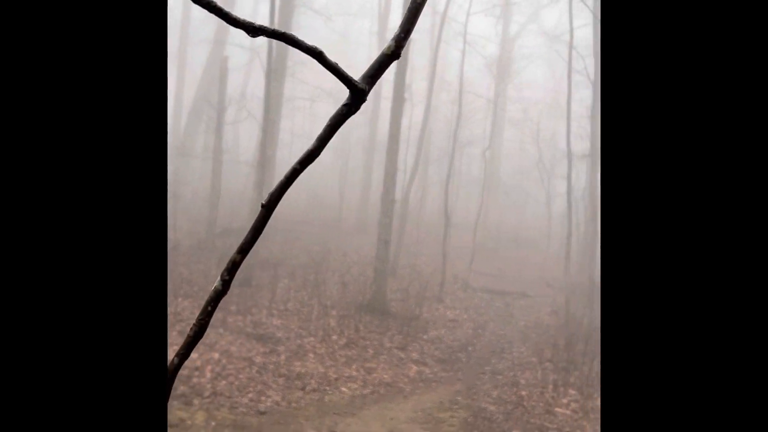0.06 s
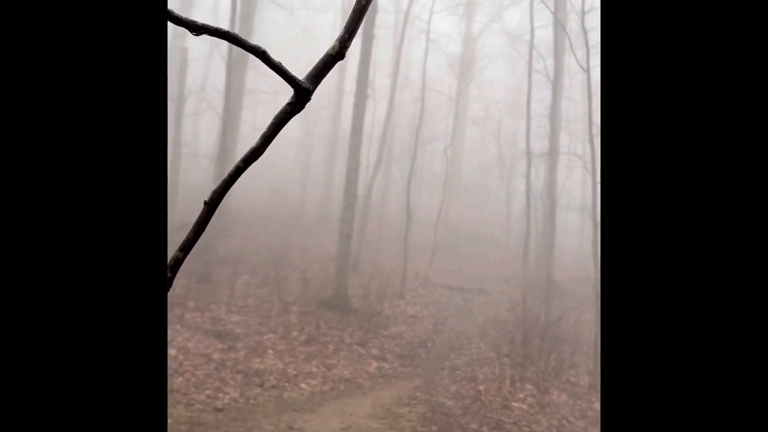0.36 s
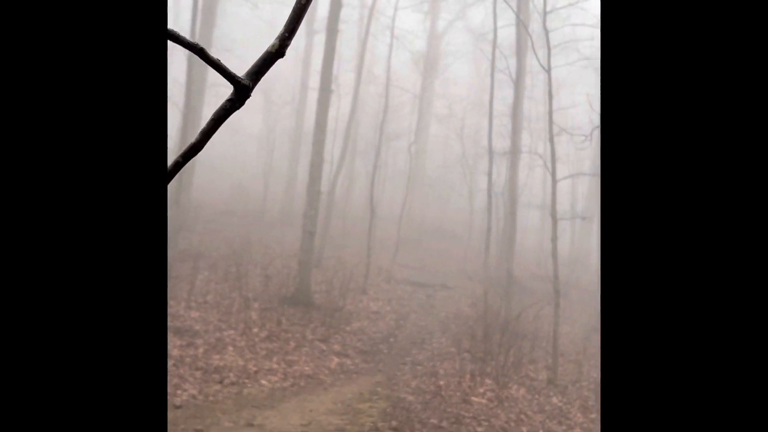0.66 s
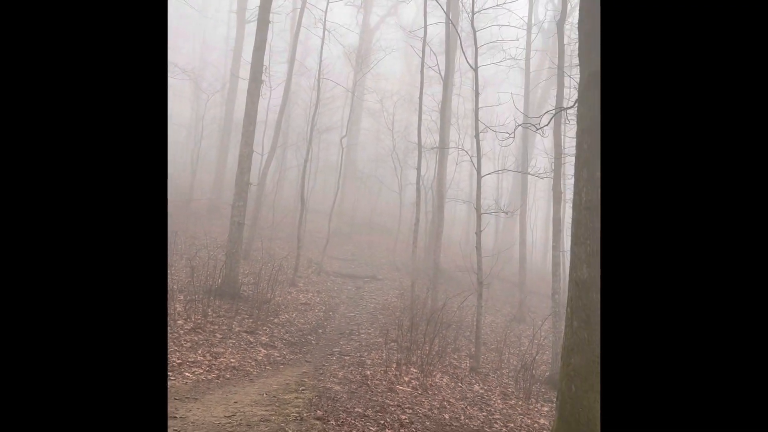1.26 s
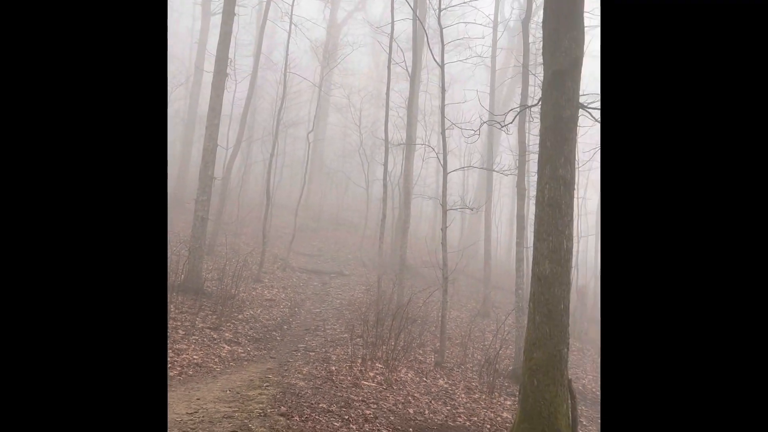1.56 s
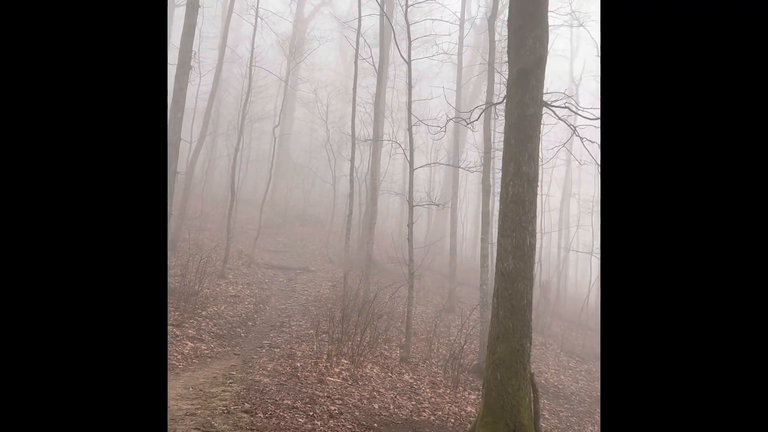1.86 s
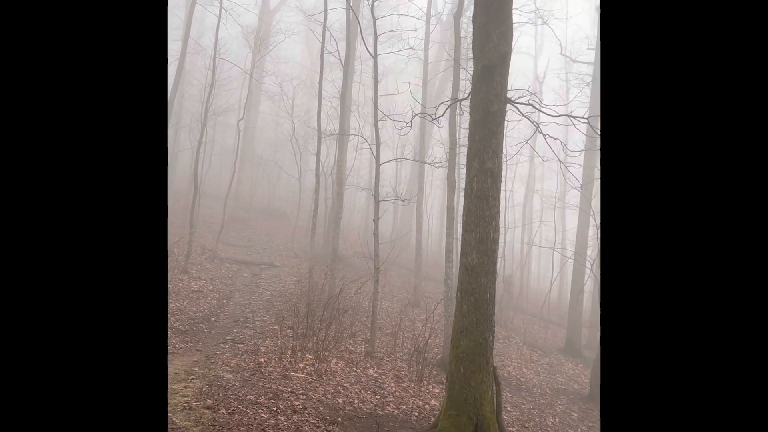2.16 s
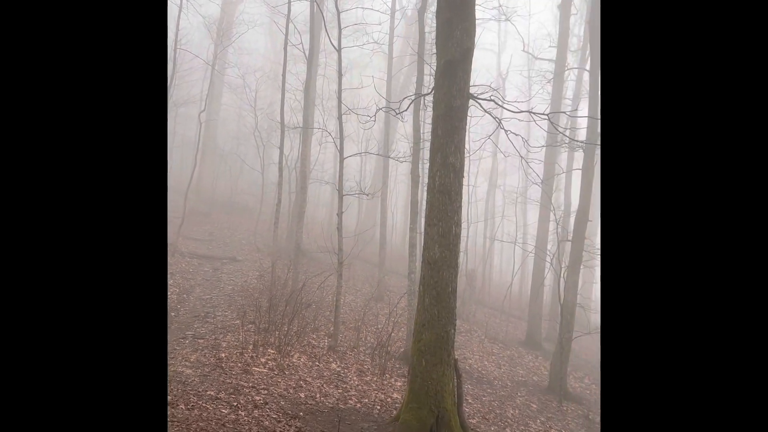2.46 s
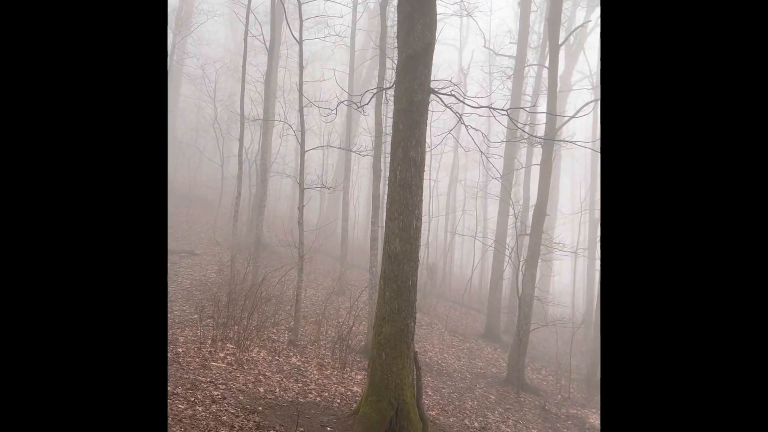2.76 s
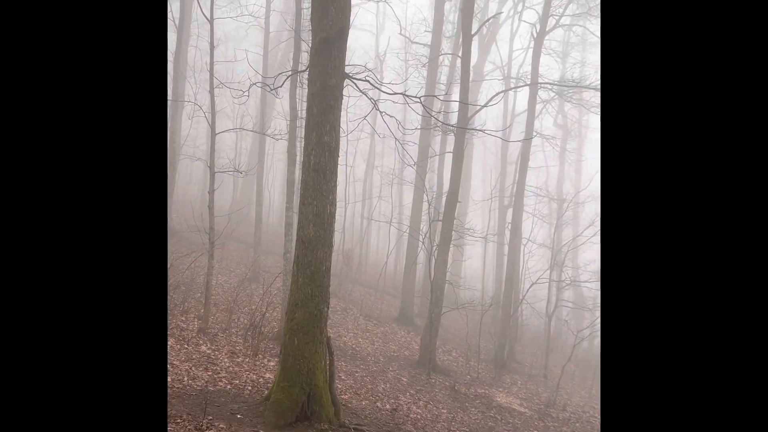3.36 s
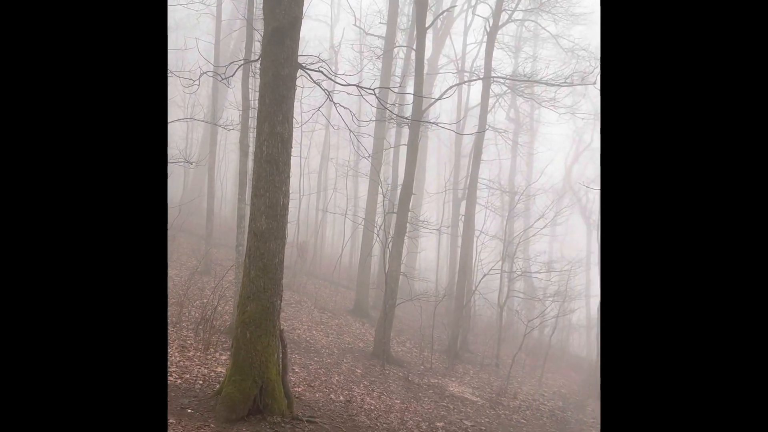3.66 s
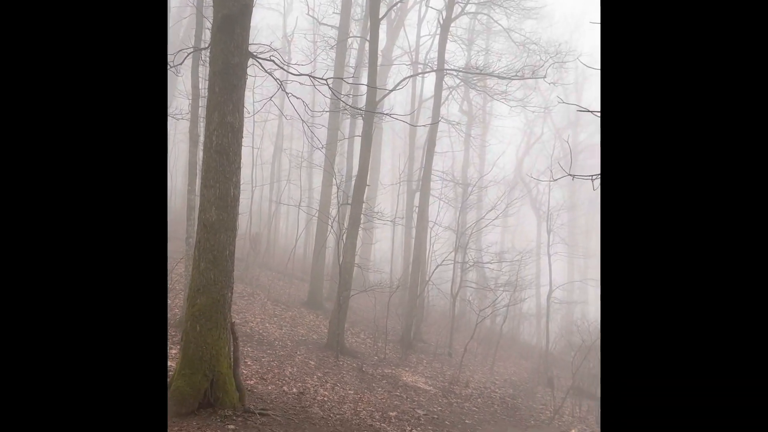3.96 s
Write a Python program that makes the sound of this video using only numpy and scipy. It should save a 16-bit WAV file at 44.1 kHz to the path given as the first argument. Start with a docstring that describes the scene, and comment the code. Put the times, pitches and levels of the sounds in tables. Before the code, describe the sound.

Drips tap sharply on forest leaf litter over faint patter and a fading wind rumble.

```python
"""From the start, sparse drops tick sharply on dead leaves in a foggy wood, over a fine sizzle of spray
and the soft patter of far drops. For the first second a breeze buffets the microphone with rumble,
puffs and dull thumps, then dies to a faint rumble with a few puffs. At 2.3 s a heavy drop knocks on
dead wood to the right, and the ticking carries on to the end while a soft low rush comes and goes."""
import sys
import numpy as np
from scipy import signal
from scipy.fft import rfft, irfft, next_fast_len
from scipy.io import wavfile
from scipy.ndimage import uniform_filter1d, map_coordinates

SR = 44100
rng = np.random.default_rng(int(sys.argv[2]) if len(sys.argv) > 2 else 0)


def inscribe(sig):
    """Save sig as 16-bit PCM at rate SR to the path in sys.argv[1].

    A 1-D sig is mono; a 2-D sig holds one channel per row.
    Samples are clipped to [-1, 1] before scaling.
    """
    pcm = np.round(np.clip(np.atleast_2d(sig).T, -1, 1) * 32767)
    wavfile.write(sys.argv[1], SR, pcm.astype(np.int16))


N = 176400
TOP_HZ = 16700  # ceiling for the microphone and for the far leaves' pitch

# Foreground ticks: t/s, level/dB, leaf pitch f/Hz, resonance Q, slap against ring level/dB
NEAR_HITS = [(0.0138, -29, 10200, 0.56, -1.5), (0.1483, -27.5, 2340, 1.3, -4.5),
             (0.2179, -38.5, 1810, 1, 7), (0.2637, -29, 9200, 2.2, -2), (0.453, -28, 9400, 0.9, 4),
             (0.561, -13.5, 6700, 1.24, -13.5), (0.595, -28, 10300, 0.8, -6), (0.61, -28, 10000, 0.62, -8),
             (0.618, -27, 9100, 0.93, -6), (0.7027, -16, 13500, 5.8, -19), (0.7174, -24, 10700, 2.4, -2.5),
             (0.7363, -21, 5540, 0.38, -17.5), (0.856, -15.5, 10500, 0.23, -6.5),
             (0.8727, -21.5, 10300, 2, -4.5), (0.957, -15, 9100, 0.71, -11.5),
             (0.9757, -17.5, 2600, 6.3, -7.5), (0.9814, -13, 6000, 1.37, -12), (1, -22, 1450, 1.5, -3.5),
             (1.0206, -19.5, 12500, 0.79, -10), (1.0732, -27, 3980, 0.46, -31),
             (1.1448, -24.5, 8800, 4.4, -28), (1.1815, -24, 4300, 0.44, 0.5), (1.2386, -29, 2330, 0.6, -13),
             (1.4316, -22.5, 1830, 1.5, -8), (1.4535, -27.5, 5400, 1, 1), (1.624, -17, 14100, 0.91, -15),
             (1.6333, -22.5, 9800, 0.6, -26), (1.821, -21.5, 14000, 0.63, -4),
             (1.909, -27, 5900, 1.4, -1.5), (1.9852, -25, 8200, 14, -3), (2.025, -24.5, 14300, 0.98, -9),
             (2.1713, -18, 3800, 4.2, -12), (2.3164, -19, 4700, 2.5, -13), (2.341, -24.5, 4060, 0.37, -24),
             (2.3783, -19.5, 9400, 1.3, -8.5), (2.4242, -30, 7700, 2.6, -1), (2.4603, -24.5, 2160, 1.1, -5),
             (2.5516, -13.5, 3880, 4.7, -32), (2.5875, -28, 12700, 0.89, -3.5), (2.593, -28, 8400, 1.9, 0),
             (2.681, -24, 2220, 2.7, 1), (2.7617, -21, 4660, 1, -12), (2.7844, -19.5, 4840, 1.6, -5),
             (2.7879, -27.5, 6560, 0.7, 3), (2.8135, -25, 7440, 1.4, -6), (2.9068, -23.5, 9500, 3.9, -3),
             (3.1936, -25.5, 14100, 0.52, -19), (3.4336, -23, 7550, 2.6, -5), (3.4559, -24.5, 3300, 4.1, 1),
             (3.535, -33, 2150, 1.8, 3), (3.6323, -20.5, 4670, 1.45, -23), (3.6973, -27, 6500, 0.38, -12),
             (3.753, -25, 13100, 1, 2.5), (3.9561, -24, 7500, 0.83, -21)]
def near_drops(gain_db=2):
    """Close drops strike dead leaves, one sharp tick each."""
    return amp(gain_db) * leaf_hits(NEAR_HITS)


# EQ of the broad slap of water on a leaf: f/Hz, level/dB
SLAP_EQ = [(100, -50), (700, -10), (1050, -3.5), (2500, -3.5), (7000, -2.5), (11000, -3.5), (16000, -10)]
def leaf_hits(hits, size=2048, pan_spread_db=5.5, phase_spread_rad=0.28):
    """Each drop touches, clicks and crushes a leaf, which rings and slaps; litter and trunks echo it."""
    t, hz = np.arange(size) / SR, np.fft.rfftfreq(size, 1 / SR) + 1
    slap = minimum_phase(colour(SLAP_EQ, hz))
    preroll = size // 16  # room for the touch ahead of the click
    out = np.zeros((2, N + size))

    def burst(db, t60_s):
        noise = rng.standard_normal((2, size)) * amp(-60 * t / t60_s)
        return amp(db) * rfft(unit(noise)) / np.sqrt(size)

    for onset, db, pitch, q, slap_db in hits:
        ring = 1 / (1 + 1j * q * (hz / pitch - pitch / hz)) ** 2
        bodies = np.array([ring, amp(slap_db) * slap])
        touch = np.conj(burst(-8.5, t60_s=0.0059))  # reversed: first contact swells into the click
        crush = burst(-3, t60_s=0.0057)  # the leaf gives way
        struck = (touch + 1 + crush) * bodies  # the 1 is the click
        struck /= np.linalg.norm(struck, axis=1, keepdims=True)
        struck *= np.linalg.norm(bodies, axis=1, keepdims=True)
        bearing = phase_spread_rad * rng.choice([-1, 1]) * rng.uniform(0.15, 1)
        ports = np.exp(np.array([[1j], [-1j]]) * bearing)
        echoes = burst(-6, t60_s=0.051) * bodies.sum(axis=0)
        tick = np.roll(irfft(struck.sum(axis=0) * ports + echoes), preroll, axis=1)
        pan_db = np.array([[.5], [-.5]]) * pan_spread_db * rng.standard_normal()
        start = max(int(onset * SR) - preroll, 0)
        out[:, start:start + size] += tick * amp(db + pan_db)
    return out[:, :N]


# Cue for the knock: t/s, level/dB
KNOCK_CUES = [(2.292, -37)]
# Modes of the dead wood: f/Hz, level/dB, T60/s
WOOD_MODES = [(272, -18, 0.045), (580, -19, 0.018), (1080, 2, 0.0085), (3100, -5, 0.0085)]
def wood_knock(left_lag_s=0.0001, left_db=-6):
    """A heavy drop knocks short modes out of dead wood; the right port hears it first and louder."""
    t = np.arange(N) / SR - np.array([[left_lag_s], [0]])
    out = np.zeros((2, N))
    for onset, db in KNOCK_CUES:
        age = np.clip(t - onset, 0, .2)
        for hz, mode_db, t60 in WOOD_MODES:
            out += amp(db + mode_db - 60 * age / t60) * np.sin(2 * np.pi * hz * age)
    return out * amp([[left_db], [0]])


# Fader ride of the breeze: t/s, level/dB
BREEZE_RIDE = [(0, -43), (.1, -38), (.23, -36.5), (.43, -39.5), (.55, -44), (.8, -51), (.93, -48),
               (1.08, -42.5), (1.2, -59.5), (1.5, -59.5), (1.9, -65.5), (2.03, -53.5), (2.2, -71),
               (2.5, -61), (3.65, -69), (4, -66)]
# EQ of its deep rumble: f/Hz, level/dB
RUMBLE_EQ = [(15, -26), (38, -16), (54, -1), (70, -3.5), (100, -9), (140, -18), (200, -31), (320, -46.5),
             (700, -100)]
# Eddies breaking on the microphone: t/s, peak level/dB
PUFF_CUES = [(0.059, -29), (0.084, -30), (0.108, -30.5), (0.182, -28), (0.202, -34.5), (0.226, -36.5),
             (0.275, -30), (0.303, -33), (0.321, -35.5), (0.36, -33.5), (0.384, -37), (0.433, -37),
             (0.488, -29), (0.508, -38.5), (0.657, -52), (0.892, -39), (0.918, -41.5), (0.948, -29),
             (0.975, -32), (1.009, -48.5), (1.05, -36), (1.443, -48.5), (1.469, -45.5), (1.524, -56),
             (2.356, -52)]
# EQ of the churn and puffs: f/Hz, level/dB
EDDY_EQ = [(50, 8), (130, -2.5), (210, 3.5), (330, -1), (450, -7), (580, -14.5), (720, -32), (950, -39.5),
           (2000, -53.5)]
def breeze(rise_s=0.0049, fall_s=0.008, lag_s=0.0021, gust_db=3, churn_db=-43):
    """The breeze rumbles unevenly on the microphone, churns when strong and breaks into short puffs."""
    t, strength_db = np.arange(N) / SR, curve(BREEZE_RIDE)
    rumble_gain = amp(strength_db + 2 + gust_db * wobble(per_s=16))
    rumble = rumble_gain * rush(RUMBLE_EQ, side_db=-14, even_s=0.0424)
    eddy_gain = amp(churn_db + 3 * (strength_db - strength_db.max()))  # grows as strength cubed
    for cue, db in PUFF_CUES:
        age = t - cue - lag_s
        fade = np.maximum(-age / rise_s, age / fall_s)
        eddy_gain = np.hypot(eddy_gain, amp(db) * np.exp(-np.minimum(fade, 20)))
    return rumble + eddy_gain * rush(EDDY_EQ, side_db=-40, even_s=0.01376)


# Slow eddies pushing on the microphone: t/s, peak level/dB
THUMP_CUES = [(0.142, -28), (0.235, -27.5), (0.39, -32), (.675, -39.5), (0.909, -33.5), (0.952, -43),
              (1.1, -40.5), (1.254, -48), (1.381, -54), (1.451, -56), (1.527, -42.5), (2.08, -46.5),
              (2.367, -48.5), (3.449, -51), (3.949, -52.5)]
# Bass-heavy EQ of each push: f/Hz, level/dB
THUMP_EQ = [(35, -13), (70, 3), (120, -6), (180, -13), (280, -29.5), (450, -46), (900, -94)]
def thumps(width_s=0.016):
    """Large slow eddies each give one dull push."""
    t = np.arange(N) / SR
    push = sum(amp(db) * np.exp(-np.minimum(((t - cue) / width_s) ** 2 / 2, 20))
               for cue, db in THUMP_CUES)
    return push * rush(THUMP_EQ, side_db=-27.5, even_s=0.0257)


def far_drops(hits_per_s=110, splash_s=0.012, leaf_hz=5760, spread_octaves=0.98, leaf_q=1.8):
    """Weaker drops land at random in pairs of drop and splash; large stiff leaves ring longer."""
    pairs = int(hits_per_s * N / SR / 2)
    size, leaf, stiffness, slap = rng.standard_normal((2 * pairs, 4)).T
    times = np.repeat(rng.uniform(0, N / SR, pairs), 2) + rng.exponential(splash_s, 2 * pairs)
    pitch = np.minimum(leaf_hz * 2 ** (spread_octaves * leaf), TOP_HZ)
    q = leaf_q * 2 ** (stiffness / 2)
    ring_db = 2 * np.log2(q / leaf_q * leaf_hz / pitch)  # longer rings get more level
    drop_db = np.minimum(-36 + 4.5 * size, -28.5)  # capped to stay in the background
    slap_db = -5.5 - ring_db + 2 * slap
    return leaf_hits(zip(times % (N / SR), drop_db + ring_db, pitch, q, slap_db))


# Fader ride of the distant bed of drops: t/s, level/dB
PATTER_RIDE = [(0, -69), (1.4, -66.5), (2.1, -67.5), (2.4, -66), (4, -67.5)]
# Its soft, mid-heavy EQ: f/Hz, level/dB
PATTER_EQ = [(300, -20), (560, -12), (950, -6.5), (1900, -4), (2900, -6), (4000, -5.5), (7000, -9),
             (11000, -18), (16000, -39)]
def patter(flutter_db=2.5):
    """The most distant drops merge into a fluttering hiss."""
    gain = amp(curve(PATTER_RIDE) + flutter_db * wobble(per_s=120))
    return gain * rush(PATTER_EQ, side_db=-3, even_s=0.1)


def spray(per_s=130, low_cut_hz=7800, bed_db=-74, thrown_db=-43, fall_s=0.021):
    """Fine droplets sizzle on the litter throughout, and flare as each near drop throws up more."""
    thrown = np.zeros(N)
    for onset, db, *_ in NEAR_HITS:
        thrown[int(onset * SR)] = amp(db + thrown_db) ** 2
    power = amp(bed_db) ** 2 + signal.lfilter([1], [1, -np.exp(-1 / (fall_s * SR))], thrown)
    droplets = (rng.random((2, N)) < per_s / SR) * rng.standard_normal((2, N)) ** 2
    sizzle = filtered(droplets, lambda hz: (1j * hz / (low_cut_hz + 1j * hz)) ** 4)
    return np.sqrt(power) * unit(sizzle)


# Fader ride of the low air: t/s, level/dB
AIR_RIDE = [(1.55, -67), (1.7, -100), (1.8, -79.5), (1.87, -85), (1.99, -64), (2.2, -83), (2.32, -63.5),
            (2.46, -88), (2.58, -69), (2.69, -78), (2.79, -71), (2.92, -93), (3.03, -64), (3.16, -81.5),
            (3.3, -63.5), (3.39, -82), (3.46, -72), (3.75, -67.5), (4, -73.5)]
# Its dark EQ: f/Hz, level/dB
AIR_EQ = [(60, 1), (230, 1.5), (480, -8.5), (800, -13), (2000, -31)]
def low_air():
    """A soft low rush of air holds steady at first, then comes and goes."""
    return amp(curve(AIR_RIDE)) * rush(AIR_EQ, side_db=-18, even_s=0.044)


def amp(db):
    """Decibels to gain."""
    return 10 ** (np.asarray(db) / 20)


def unit(x):
    """Scaled to rms 1."""
    return x / np.sqrt(np.mean(x ** 2) + 1e-20)


def colour(eq, hz):
    """Gain of an EQ curve, drawn on a log frequency axis."""
    f, db = np.transpose(eq)
    return amp(np.interp(np.log(hz + 1), np.log(f + 1), db))


def curve(ride):
    """A fader ride as one value per sample."""
    return np.interp(np.arange(N) / SR, *np.transpose(ride))


def wobble(per_s):
    """Smooth random modulation with per_s knots a second."""
    knots = rng.standard_normal(int(N * per_s / SR) + 4)
    return map_coordinates(knots, [np.arange(N) * per_s / SR])


def filtered(x, response):
    """x through a frequency response."""
    size = next_fast_len(N + SR // 2)
    return irfft(rfft(x, size) * response(np.fft.rfftfreq(size, 1 / SR)), size)[..., :N]


def minimum_phase(gain):
    """The causal response with this gain and the tightest attack."""
    cepstrum = irfft(np.log(gain))
    half = len(cepstrum) // 2
    cepstrum[1:half] *= 2
    cepstrum[half + 1:] = 0
    return np.exp(rfft(cepstrum))


def rush(eq, side_db, even_s):
    """Coloured stereo noise whose level holds even over spans longer than even_s."""
    pair = filtered(rng.standard_normal((2, N)), lambda hz: colour(eq, hz))
    power = uniform_filter1d(pair ** 2, max(int(even_s * SR), 2), axis=1)
    mid, side = pair / np.sqrt(np.abs(power) + 1e-20)
    return np.array([mid + amp(side_db) * side, mid - amp(side_db) * side])


def scene():
    """The mix: moving air in the low end, drops and their spray above it."""
    air = breeze() + thumps() + low_air()
    return air + patter() + near_drops() + wood_knock() + far_drops() + spray()


# Stereo width by band: f/Hz, side level/dB
SIDE_EQ = [(50, -1), (120, 7), (300, 16), (550, 17.5), (850, 11), (1350, 4.5), (1850, -15), (2600, 0),
           (3900, -5), (5000, -5.5), (15000, -14)]
# Phase between the microphone ports: f/Hz, left lead/rad
LEFT_LEAD = [(2000, -0.14), (3000, 1), (4300, -0.24), (5200, -1.2), (6400, -1.3), (15000, -1.44)]
# Tone of the microphone: f/Hz, level/dB
MIC_EQ = [(300, -1.5), (600, -0.5), (1200, -0.5), (2000, 0.5), (5000, -3.5), (7000, -1.5), (9800, -3),
          (10900, -1.5), (12400, -9.5), (15500, -6.5), (16600, -27)]
def record(dry):
    """The microphone pair widens some bands, shifts phase, colours the sound and cuts off the top."""
    def response(hz):
        lead = np.interp(hz, *np.transpose(LEFT_LEAD))
        return np.exp(np.array([[.5j], [-.5j]]) * lead) * colour(MIC_EQ, hz) * (hz < TOP_HZ)

    mid = (dry[0] + dry[1]) / 2
    side = filtered((dry[0] - dry[1]) / 2, lambda hz: colour(SIDE_EQ, hz))
    return filtered(np.array([mid + side, mid - side]), response)


dry = scene()
out = record(dry)
inscribe(out)
```